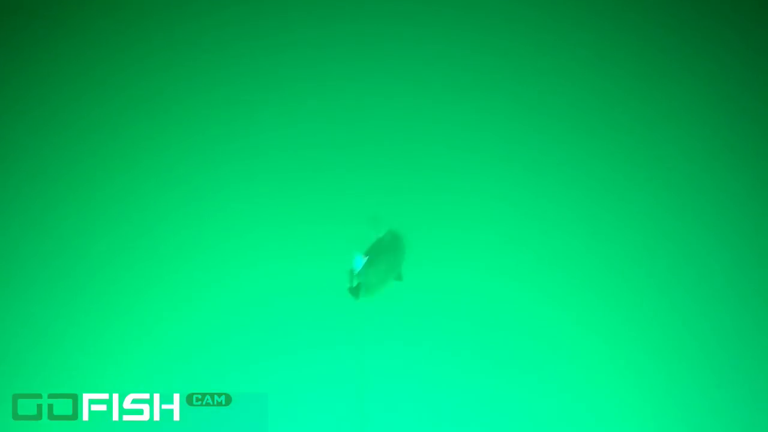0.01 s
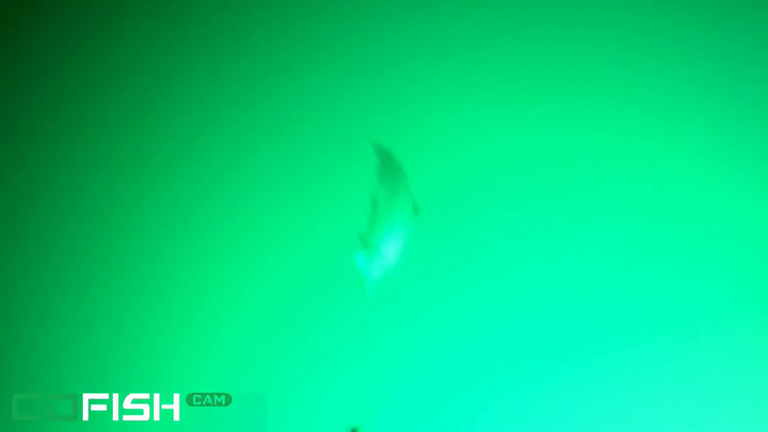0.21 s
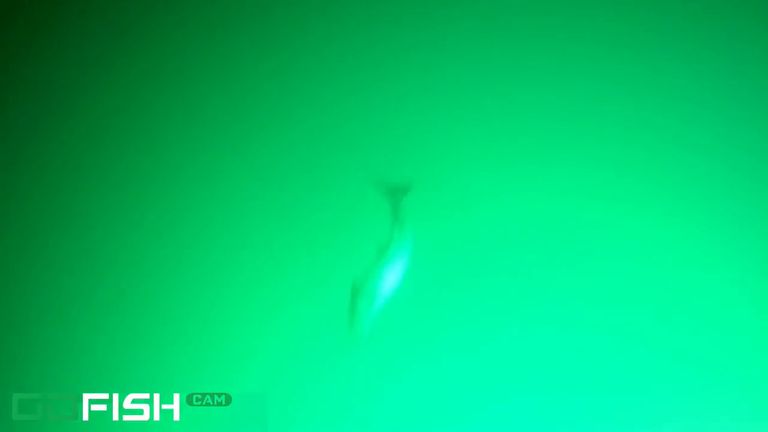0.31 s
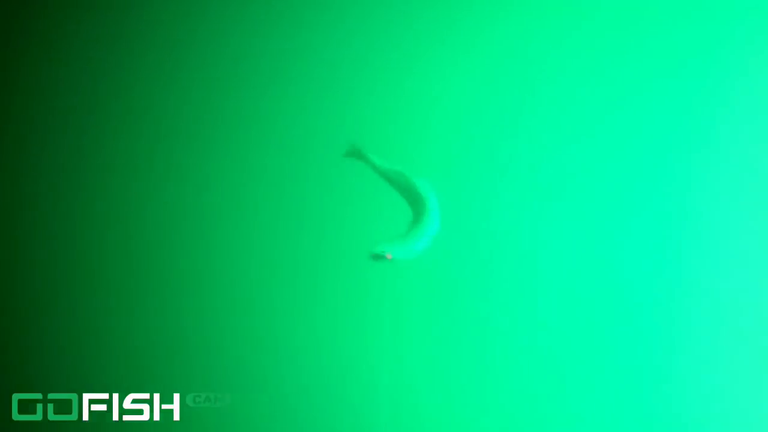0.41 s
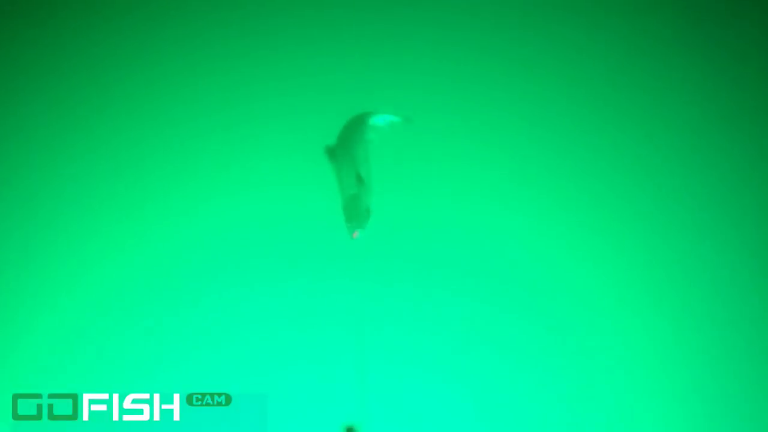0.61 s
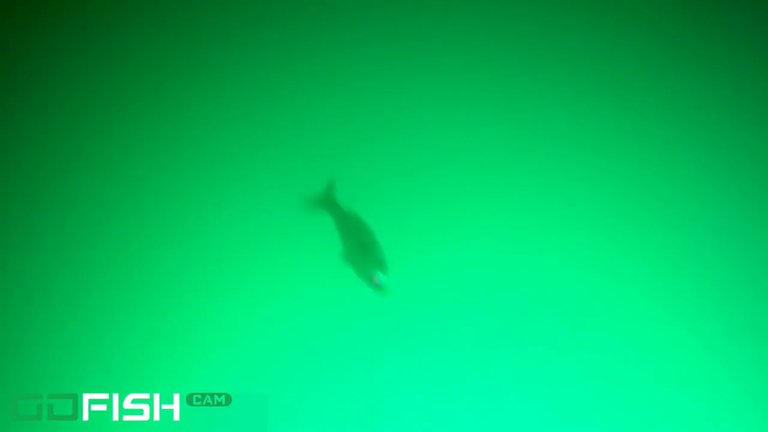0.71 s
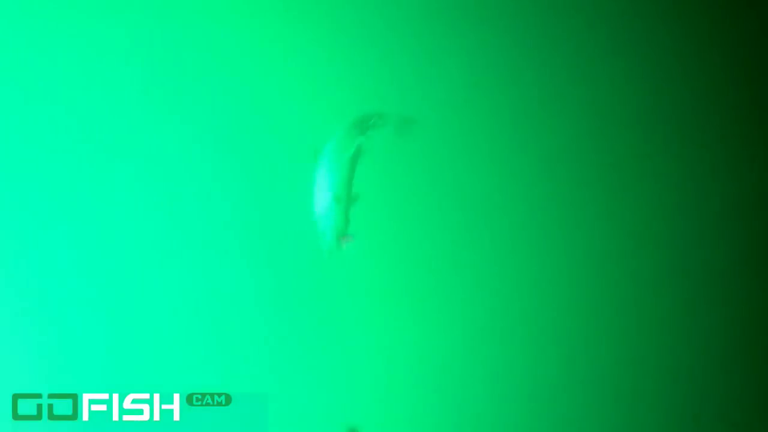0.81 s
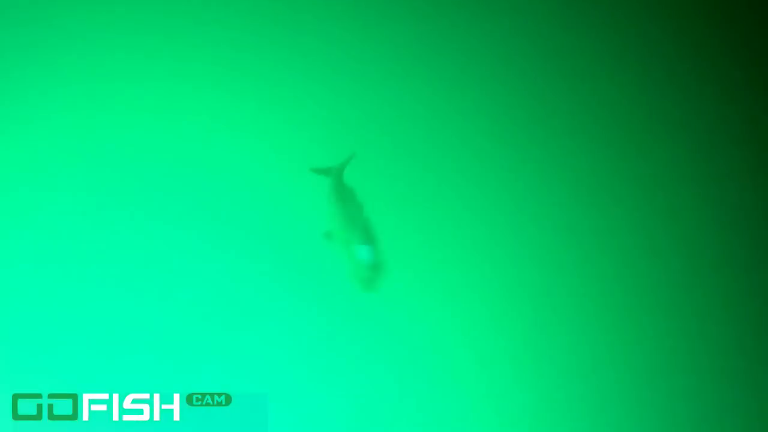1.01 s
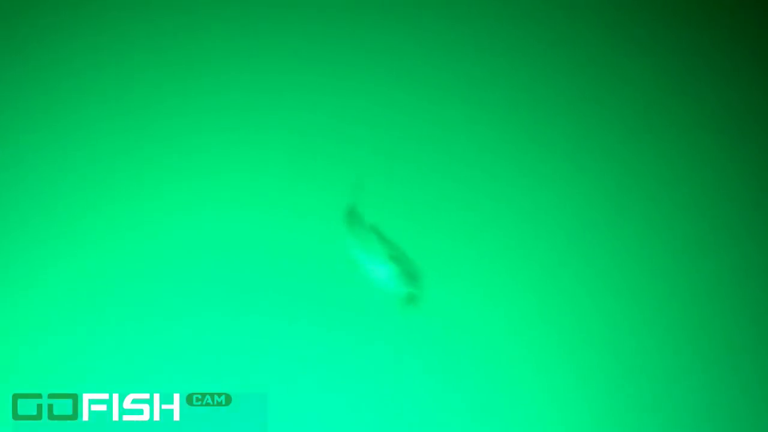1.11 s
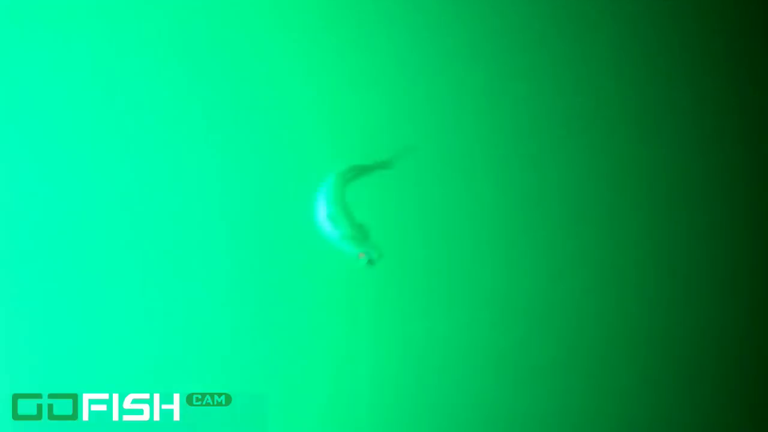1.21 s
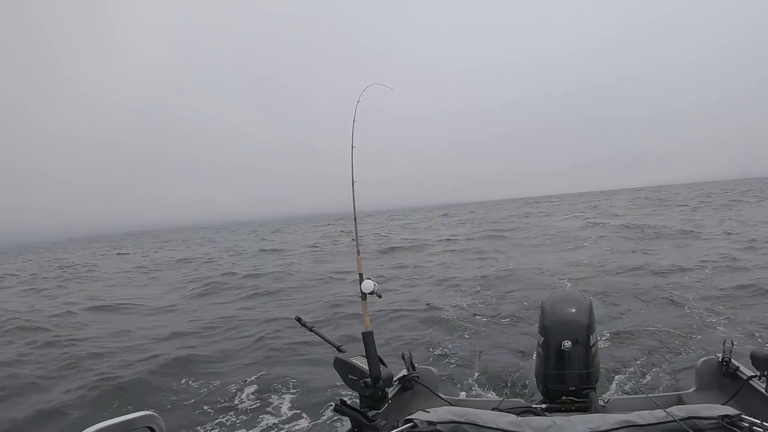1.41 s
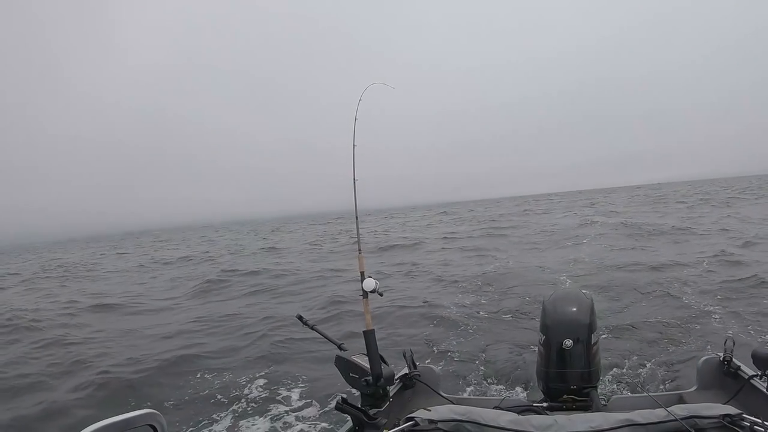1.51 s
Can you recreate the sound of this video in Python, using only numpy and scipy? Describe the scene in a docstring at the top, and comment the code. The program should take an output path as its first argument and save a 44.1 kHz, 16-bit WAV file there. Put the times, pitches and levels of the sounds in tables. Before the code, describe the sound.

A towed fishing lure's tackle rattles in uneven bursts with sharp knocks against a small underwater camera housing, over water rush and hiss; a click then cuts to a faint idling outboard, wash and low wind.

```python
"""Under water, then in an open boat: a towed camera follows a trolling lure.
Tackle rattles in bursts of tiny contacts and sharp knocks that ring the camera's housing; soft tugs push it.
Behind are a wavering sine for the taut line, and shaped noise for rushing water and hiss.
A gain control turns all of this down when it gets loud.
After a click come an idling outboard, made of four sines, and wash and wind, made of shaped noise."""
import sys
import numpy as np
from scipy import signal
from scipy.fft import rfft, irfft, next_fast_len
from scipy.io import wavfile
from scipy.ndimage import map_coordinates

SR = 44100
rng = np.random.default_rng(int(sys.argv[2]) if len(sys.argv) > 2 else 0)


def wav_record(signal):
    """Record a signal, one row per channel, as 16-bit PCM in the file named by sys.argv[1]."""
    frames = np.transpose(np.atleast_2d(signal))
    bounded = np.clip(frames, -1, 1)
    # unit amplitude maps onto the largest positive 16-bit level
    quanta = np.round(bounded * 32767).astype(np.int16)
    wavfile.write(sys.argv[1], SR, quanta)


N = 70560  # length in samples

# Levels under water are those before the gain control.
# Bursts of rattling. Each row: start in seconds, length in seconds, level in dB,
# brightness in dB per octave.
RATTLE_BURSTS = [(.003, 0.025, -31.5, -10.5), (0.051, 0.013, -32.5, -14.5), (0.124, 0.0046, -27, 29.5),
                 (0.148, 0.0041, -24, -3.5), (0.156, 0.0072, -24, -5.5), (0.198, 0.0088, -31, -8),
                 (.207, 0.015, -9.5, -4.5), (0.225, .019, -5.5, 2), (0.25, 0.021, -13, 4),
                 (.270, .014, -20, -1.5), (0.287, 0.0056, -10.5, 1), (.296, 0.021, -20, -5.5),
                 (0.323, 0.004, -16.5, -13.5), (0.329, 0.0092, -12.5, -5.5), (0.339, 0.0066, -18.5, -1),
                 (.359, 0.011, -10.5, 0), (0.368, 0.018, -19.5, -5.5), (0.391, 0.005, -21, -2),
                 (0.398, 0.0052, -12.5, -2.5), (0.408, 0.0073, -16, -6), (0.438, 0.0042, -28, -4),
                 (.477, 0.01, -31, -2), (0.494, 0.023, -22, -14.5), (.508, 0.013, -15.5, -4),
                 (0.52, 0.011, -5, -3.5), (0.547, 0.018, -6, 2), (0.567, 0.01106, -1.5, 2.5),
                 (0.581, 0.022, -8, 1.5), (0.603, 0.0048, -17, -4.5), (0.62, 0.027, -16, -2),
                 (0.645, 0.0065, -12.5, 0), (.652, 0.0077, -7.5, 2), (0.658, 0.017, -21.5, 0),
                 (0.721, 0.011, -29.5, -11.5), (.798, 0.023, -20, -6), (0.825, 0.011, -21.5, -6),
                 (0.841, 0.023, -7, 0), (0.86, 0.021, -5, 4.5), (0.881, 0.035, -17.5, -4.5),
                 (0.935, 0.0087, -13.5, 2.5), (.947, .010, -12, -3.5), (0.957, 0.0061, -2, 0),
                 (0.965, 0.011, -1, 4), (0.978, .008, -13, -1), (0.991, 0.019, -23, -6),
                 (1.011, .011, -10.5, -5.5), (1.028, 0.023, -13, -4.5), (1.05, 0.0176, -24, -10),
                 (1.075, 0.04, -36, -7), (1.104, 0.01007, -12.5, -4.5), (1.109, .008, -22, -23),
                 (1.134, 0.017, -9.5, -3.5), (1.145, 0.0072, -4, 1), (1.156, 0.023, -13, -4.5),
                 (1.182, 0.079, -6.5, 2), (1.256, 0.012, -34, -4), (1.303, 0.0082, -32, 18)]
# Ringing of the housing. Each row: pitch in Hz, relative level in dB, time to fall by 60 dB in seconds.
HOUSING_MODES = [(1235.5, -8.5, 0.036), (1314, -7, 0.019), (1434, -6.5, 0.031), (1644, -11, 0.04),
                 (2178, -5.5, 0.042), (2358, -0.5, 0.023), (2555, 0.5, 0.031), (2694, -0.5, 0.028),
                 (2867, 0.5, 0.036), (3157, -10, 0.041), (3365, -7.5, 0.029), (3840, -18.5, 0.031),
                 (5040, -30, 0.014), (9100, -39, .003)]
# Colour of the dry part of a contact. Each row: frequency in Hz, relative level in dB.
TICK_COLOUR = [(100, -44), (300, -29), (550, -0.5), (800, -24.5), (1200, -12.5), (1800, -10.5), (2600, 2.5),
               (3500, -10.5), (4100, -18.5), (4500, -34), (5200, -31), (6200, -66), (7500, -58),
               (9300, -44.5), (11500, -55), (16000, -55)]
# Single sharp knocks of the tackle. Each row: start in seconds, peak level in dB.
TACKLE_KNOCKS = [(.063, -18.5), (0.1261, -21), (0.1504, -20.5), (0.4414, -20.5), (.239, 0.5), (.334, -2),
                 (.404, -6), (.5157, 3.5), (.5585, 5), (.569, 6), (.655, -3.5), (.8565, 7.5), (.959, 2),
                 (.967, 4), (.9727, 11), (1.149, 3.5)]
# Soft tugs on the housing. Each row: start in seconds, starting level in dB.
LINE_TUGS = [(0.501, -37.5), (.570, -52), (0.966, -55)]
# Hum of the taut line, following the towing speed. Each row: time in seconds, middle pitch in Hz,
# middle level in dB.
LINE_HUM = [(0, 550, -44), (.17, 535, -41), (.22, 591.2, -38), (.29, 500, -50.5), (.37, 530, -38.5),
            (.45, 422.2, -50), (.53, 520, -43.5), (.72, 540, -45.5), (.80, 540, -41), (.83, 610, -33.5),
            (.88, 470, -54), (.94, 550, -44), (1.05, 370, -41), (1.14, 466.5, -44.5), (1.18, 599, -33.5),
            (1.22, 650, -27.5), (1.27, 540, -46), (1.33, 430, -45)]
# Colour of the rushing water. Each row: frequency in Hz, relative level in dB per Hz.
WATER_COLOUR = [(30, -42), (100, -20), (250, -9.5), (480, 1), (780, -4), (1200, -1), (1700, -13),
                (2800, 1.5), (3500, -13), (4000, 0), (4400, -15), (5000, -12), (6000, -22), (16000, -40)]
# Colour of the hiss. Each row: frequency in Hz, relative level in dB per Hz.
HISS_COLOUR = [(500, -49), (5000, -9), (8000, -2), (12000, -1), (15500, -1.5)]
# Colour of the click between the two places. Each row: frequency in Hz, relative level in dB.
SWITCH_COLOUR = [(100, -10), (1000, 1), (3000, 4.5), (6000, -6.5), (15000, -14)]
# Tones of the outboard. Each row: pitch in Hz, level in dB before the swell,
# size of the random waver in dB (its sign does not matter).
ENGINE_TONES = [(40, -37, -2), (159.4, -43.5, -0.5), (232, -54.5, -4.5), (435, -62, -4)]
# Rise and fall of the outboard. Each row: time in seconds, change of level in dB.
ENGINE_LEVEL = [(1.335, -0.5), (1.38, -2), (1.43, 3), (1.51, -3), (1.56, -3.5), (1.6, -4)]
# Colour of the wash. Each row: frequency in Hz, relative level in dB per Hz.
WASH_COLOUR = [(150, -34), (250, -14), (369, -35), (393, -10), (441, -5.5), (494, -16), (1280, -11),
               (3990, -23.5), (6080, -27), (6700, -31), (12000, -81), (15600, -111), (22000, -120)]
# Colour of the wind. Each row: frequency in Hz, relative level in dB per Hz.
WIND_COLOUR = [(15, -11), (40, 5.5), (70, -4.5), (120, -6.5), (220, -12), (400, -21), (1500, -62),
               (5000, -120)]

CONTACTS_PER_S = 1500  # on average
CONTACT_MOVES_S, CONTACT_POINTS = 0.012, 4  # the contact point wanders, and the ringing changes with it
SIZE_SPREAD_DB, EDGE_DB = 3, -2  # random contact size; change of level at both ends of a burst
LOW_CUT_HZ = 1020
RING_DB = 0.5  # ringing against the dry tick
PITCH_SPREAD = 0.02  # random detuning, as a share of the pitch
KNOCK_HZ, KNOCK_RISE_S = 2764, 0.00071
TUG_HZ, TUG_T60_S = 91, 0.056
LINE_WAVER_HZ, LINE_WAVER_DB = 18, 3
WATER_DB, WATER_FLUTTER_DB, HISS_DB = -38.5, 1.3, -46.5
AGC_KNEE_DB, AGC_SHARE = -19, 0.48  # the share of the excess level that is taken away
AGC_ATTACK_S, AGC_RELEASE_DB_PER_S = 0.0076, 79.5
WASH_DB, WIND_DB = -47, -40
SURFACE_S, SWITCH_DB = 1.335, -0.5  # time of the change to the boat, level of its click
CEILING, TOP_HZ = 0.93, 15850  # clipping point and upper band limit


def amp(db):
    """Turn decibels into gain."""
    return 10 ** (np.asarray(db) / 20)


def unit(x):
    """Scale to rms 1."""
    return x / np.sqrt(np.mean(x ** 2) + 1e-20)


def along(points, hz):
    """Read a value between (Hz, value) points, with frequency on a log axis."""
    f, v = np.transpose(points)
    return np.interp(np.log(hz + 1), np.log(f + 1), v)


def curves(rows):
    """Join the rows by straight lines: one curve for each column after the time."""
    s, *columns = np.transpose(rows)
    return [np.interp(np.arange(N) / SR, s, column) for column in columns]


def wobble(rate):
    """A smooth random curve around zero, through `rate` random points a second."""
    knots = rng.standard_normal(2048)
    return map_coordinates(knots, [np.arange(N) * rate / SR + 2], mode="mirror")


def filtered(x, response):
    """Multiply the spectrum of x by a function of frequency."""
    m = next_fast_len(N + SR // 2)
    return irfft(rfft(x, m) * response(np.fft.rfftfreq(m, 1 / SR)), m)[:N]


def noise(colour):
    """Random noise of the given colour, at rms 1."""
    return unit(filtered(rng.standard_normal(N), lambda hz: amp(along(colour, hz))))


def click(colour, size=2048):
    """A click of the given colour that starts at once (minimum phase), with energy 1."""
    log_gain = along(colour, np.fft.rfftfreq(size, 1 / SR)) * np.log(10) / 20
    cepstrum = irfft(log_gain)
    # fold the second half onto the first, so nothing sounds before the start
    cepstrum[1:size // 2] *= 2
    cepstrum[size // 2 + 1:] = 0
    h = irfft(np.exp(rfft(cepstrum)))
    return h / np.linalg.norm(h)


def add(out, s, x):
    """Mix x into out at s seconds."""
    i = max(0, round(s * SR))
    out[i:i + len(x)] += x[:len(out) - i]


def housing(size=2048):
    """One contact: a dry tick, and fading housing modes that differ a little every time."""
    t = np.arange(size) / SR
    hz, db, t60 = np.transpose(HOUSING_MODES)[:, :, None]
    detune, level, phase = rng.standard_normal((3, len(HOUSING_MODES), 1))
    mode_hz = hz * (1 + PITCH_SPREAD * detune)
    modes = amp(db + 2 * level - 60 * t / t60) * np.sin(2 * np.pi * (mode_hz * t + phase))
    soft_start = 1 - np.exp(-(t / 0.0005) ** 2)
    ring = modes.sum(0) * soft_start
    return click(TICK_COLOUR) + amp(RING_DB) * ring / np.linalg.norm(ring)


def rattle(size=8192, count=256):
    """Each burst is a run of uneven contacts at uneven gaps; the small housing passes little bass."""
    out = np.zeros(N)
    low_cut = signal.butter(4, LOW_CUT_HZ, "high", fs=SR, output="sos")
    for s, length, db, bright in RATTLE_BURSTS:
        gaps = rng.uniform(0.2, 1.8, count)
        at = (np.cumsum(gaps) - gaps[0]) / CONTACTS_PER_S
        edge = (2 * at / length - 1) ** 2  # 0 in the middle of the burst, 1 at its ends
        sizes_db = SIZE_SPREAD_DB * rng.standard_normal(count) + EDGE_DB * edge
        point = at // CONTACT_MOVES_S % CONTACT_POINTS
        spectrum = 0
        for k in range(CONTACT_POINTS):
            hit = (at <= length) & (point == k)
            contacts = np.bincount((at[hit] * SR).astype(int), amp(sizes_db[hit]), size)
            # every contact sets off the ringing of its point
            spectrum = spectrum + rfft(contacts, size) * rfft(housing(), size)
        tilt = click([(1250, -bright), (5000, bright)])
        burst = signal.sosfilt(low_cut, irfft(spectrum * rfft(tilt, size)))
        # share the energy over the length, so the table gives the rms level
        add(out, s, amp(db) * np.sqrt(length * SR) * burst / np.linalg.norm(burst))
    return out


def knocks():
    """A knock swells and dies within a few cycles of the housing's main resonance."""
    out, t = np.zeros(N), np.arange(SR // 100) / SR
    u = t / KNOCK_RISE_S
    envelope = u ** 2 * np.exp(2 * (1 - u))  # peaks at 1
    for s, db in TACKLE_KNOCKS:
        hz = KNOCK_HZ * (1 + PITCH_SPREAD * rng.standard_normal())
        add(out, s, amp(db) * envelope * np.sin(2 * np.pi * hz * t))
    return out


def tugs():
    """A pull on the line gives the housing one dull push: a low, fading sine."""
    out, t = np.zeros(N), np.arange(SR // 10) / SR
    for s, db in LINE_TUGS:
        add(out, s, amp(db - 60 * t / TUG_T60_S) * np.sin(2 * np.pi * TUG_HZ * t))
    return out


def line():
    """The taut line hums in the flow, unsteady in pitch and level."""
    hz, db = curves(LINE_HUM)
    phase = 2 * np.pi * np.cumsum(hz + LINE_WAVER_HZ * wobble(120)) / SR
    return amp(db + LINE_WAVER_DB * wobble(69.3)) * np.sin(phase)


def water():
    """Flow noise in the housing: shaped noise with a fluttering level."""
    return amp(WATER_DB + WATER_FLUTTER_DB * wobble(90.8)) * noise(WATER_COLOUR)


def hiss():
    """Bright shaped noise, steady until the gain control ducks it."""
    return amp(HISS_DB) * noise(HISS_COLOUR)


def gain_control(x):
    """The underwater camera turns down quickly on loud bursts and recovers at a slower, steady rate."""
    k = np.exp(-1 / (AGC_ATTACK_S * SR))
    power = signal.lfilter([1 - k], [1, -k], x ** 2)
    level_db = 10 * np.log10(power + 1e-12)
    wanted_cut_db = AGC_SHARE * np.maximum(level_db - AGC_KNEE_DB, 0)
    # hold the largest cut so far while it shrinks along a straight line in dB
    release = AGC_RELEASE_DB_PER_S * np.arange(N) / SR
    cut_db = np.maximum.accumulate(wanted_cut_db + release) - release
    return x * amp(-cut_db)


def outboard():
    """The idling engine throbs: its tones share one uneven speed, and each wavers in level."""
    swell_db, = curves(ENGINE_LEVEL)
    turns = np.cumsum(1 + 0.018 * wobble(17)) / SR
    engine = np.zeros(N)
    for hz, db, waver in ENGINE_TONES:
        tone = np.sqrt(2) * np.sin(2 * np.pi * (hz * turns + rng.random()))  # rms 1
        engine += amp(db + waver * wobble(25.3)) * tone
    return amp(swell_db) * engine


def wash():
    """Water around the boat: steady shaped noise."""
    return amp(WASH_DB) * noise(WASH_COLOUR)


def wind():
    """Wind over the open boat: steady, mostly low noise."""
    return amp(WIND_DB) * noise(WIND_COLOUR)


def scene():
    """Under water, then a click and the open boat."""
    below = gain_control(rattle() + knocks() + tugs() + line() + water() + hiss())
    boat = outboard() + wash() + wind()
    out = np.where(np.arange(N) / SR < SURFACE_S, below, boat)
    add(out, SURFACE_S, amp(SWITCH_DB) * click(SWITCH_COLOUR))
    return out[None]


def record(dry):
    """The loudest peaks clip; a very steep filter then removes what lies above the band limit."""
    clipped = np.clip(dry[0], -CEILING, CEILING)
    return filtered(clipped, lambda hz: 1 / (1 + (hz / TOP_HZ) ** 200))[None]


dry = scene()
out = record(dry)
wav_record(out)
```